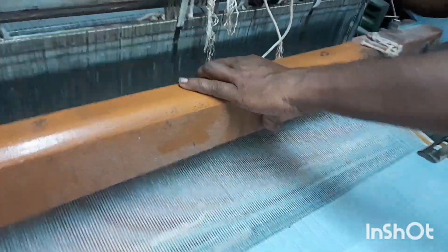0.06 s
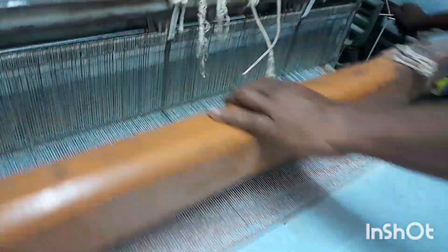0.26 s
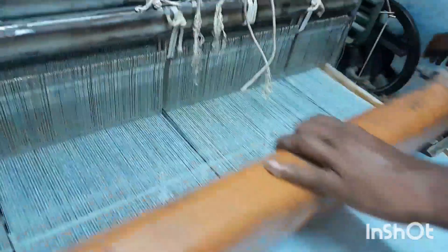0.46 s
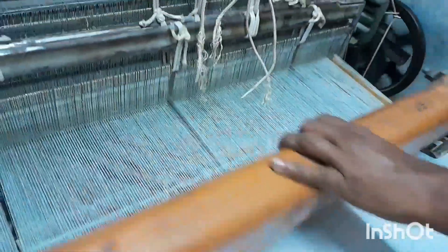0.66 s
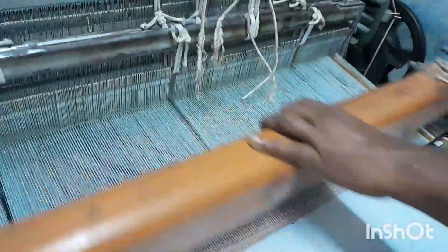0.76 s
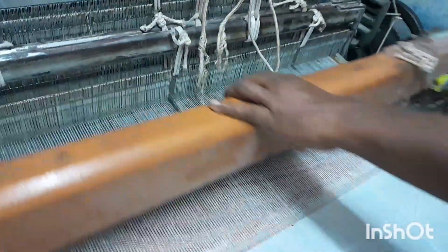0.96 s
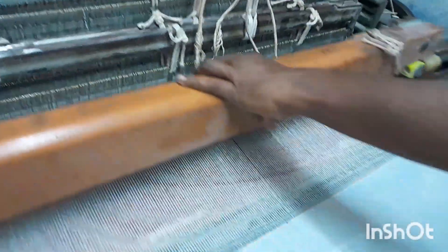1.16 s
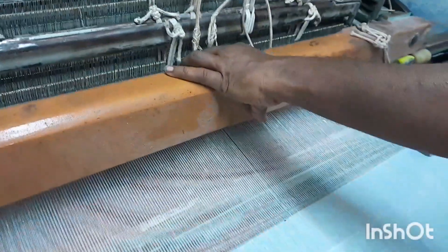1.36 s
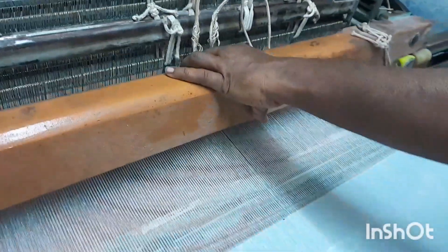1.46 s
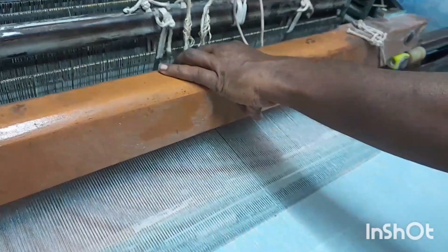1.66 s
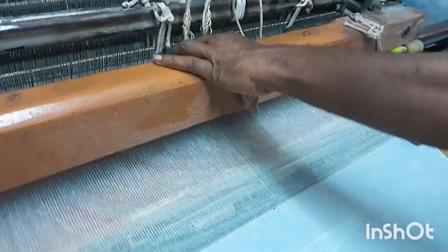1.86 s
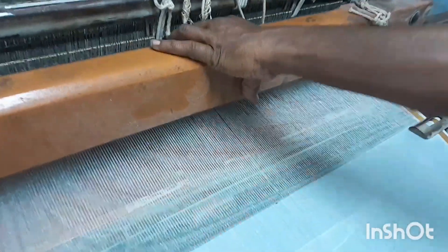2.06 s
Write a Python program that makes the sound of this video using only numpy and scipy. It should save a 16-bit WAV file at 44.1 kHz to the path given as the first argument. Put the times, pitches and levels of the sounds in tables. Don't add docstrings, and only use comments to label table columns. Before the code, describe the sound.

A hand-worked loom clatters through one stroke: links clink, the reed hisses over threads, the beam thumps the cloth, wooden pegs knock on return, and the shuttle slams; close phone microphone in a hard-walled workshop.

```python
import sys
import numpy as np
from scipy import signal
from scipy.fft import rfft, irfft
from scipy.io import wavfile
from scipy.ndimage import uniform_filter1d

SR = 44100
rng = np.random.default_rng(int(sys.argv[2]) if len(sys.argv) > 2 else 0)


def makeup_ratio(level_db):
    decades = np.asarray(level_db, float) / 20
    return 10 ** decades


def store_pcm(level_fs):
    pcm = np.round(np.clip(level_fs, -1, 1) * 32767).astype(np.int16)
    wavfile.write(sys.argv[1], SR, np.atleast_2d(pcm).T)


N = 92610


def evened(x):
    return x / np.sqrt(np.mean(x ** 2) + 1e-20)


def read(points, hz):
    f, value = np.transpose(points)
    return np.interp(np.log(hz + 1), np.log(f + 1), value)


def coloured(x, points):
    hz = abs(np.fft.fftfreq(8192, 1 / SR))
    log_gain = np.log(makeup_ratio(np.maximum(read(points, hz), -100)))
    taps = np.fft.ifft(np.exp(np.conj(signal.hilbert(log_gain)))).real[:4096]
    return signal.oaconvolve(x, taps / np.linalg.norm(taps))[:len(x)]


def level(curve):
    s, db = np.transpose(curve)
    return makeup_ratio(np.interp(np.arange(N) / SR, s, db))


def nearby(x, side):
    port_lag_s, early_s, early_db = .0005, .016, -12
    taps = np.zeros((2, 900))
    at = (rng.random((2, 24)) * early_s * SR).astype(int) + 60
    echoes = rng.choice([-1., 1.], at.shape) * makeup_ratio(early_db - 8 * at / (early_s * SR))
    np.put_along_axis(taps, at, echoes, 1)
    taps[0, 30] = 1
    taps[1, 30 + round(side * port_lag_s * SR)] = 1
    return signal.fftconvolve(x[None], taps / 2, axes=1)[:, 30:len(x) + 30]


def struck(blows, modes, tone, gain_db, rise_s):
    bounces_per_s, bounce_spread_db, first_blow = 1700, 1.5, 12.0
    mode_spread_db, pair_spread = 0.91, .005
    t = np.arange(SR // 2) / SR
    out = np.zeros((2, N + SR))
    peak = round(rise_s * SR)
    for s, db, rattle_s, ring_db, tilt_db in blows:
        hit, size = rng.random(len(t)), rng.exponential(1, len(t))
        hiss = rng.standard_normal(len(t))
        fade = np.exp(-t / max(rattle_s, .002)) * np.minimum((t + 1 / SR) / max(rise_s, 1e-4), 1)
        bounces = (hit < bounces_per_s / SR) * makeup_ratio(bounce_spread_db * np.minimum(size, 4)) * np.sign(hiss)
        bounces[peak] = 1.03
        ring = np.zeros(len(t))
        for hz, mode_db, t60_s in modes:
            a, b = rng.standard_normal(2)
            start_db = mode_db + mode_spread_db * a + tilt_db * np.log2(hz / 2000)
            decay = makeup_ratio(start_db - 60 * t / np.clip(t60_s, .015, .16))
            beating = np.cos(2 * np.pi * hz * pair_spread * b * t)
            ring += decay * np.sin(2 * np.pi * hz * t) * beating
        drive = bounces * fade
        drive[peak] += first_blow
        rung = signal.fftconvolve(drive, ring)[:len(t)]
        tilted = [(hz, tone_db + tilt_db * np.log2(hz / 2000)) for hz, tone_db in tone]
        clatter = coloured((bounces + .5 * hiss) * fade, [(40, -50)] + tilted)
        first = slice(0, 660)
        sound = clatter / np.std(clatter[first]) + makeup_ratio(ring_db) * rung / np.std(rung[first])
        at = round(s * SR)
        out[:, at:at + len(t)] += makeup_ratio(db + gain_db) * nearby(sound, rng.uniform(-0.78, 1))
    return out[:, :N]


# (time [s], strength [dB], rattle [s], ring re clatter [dB], brightness [dB/octave])
LINK_BLOWS = [
    (.1595, -11, 0.0073, -8, 0.1),
    (.2205, -12, 0.023, -16, 0),
    (.259, -17.5, 0.12, -2, -1.5),
    (.2845, -2, 0.055, -2, 1.5),
    (.4105, -1, 0.054, -10, 0.7),
    (.5905, -4, 0.074, -24, 4),
    (.6105, 0.5, 0.05, -9, 1.5),
    (.879, -17.5, 0.0053, -13, -2.5),
    (1.189, -16.5, 0.0067, -21, 4.5),
]
# (frequency [Hz], level [dB], t60 [s])
LINK_MODES = [(3074, -7, .05), (3822, 0, .055), (4980, -7, .07), (5760, -8, .07), (6700, -8, .06),
              (12460, -3, .08), (13130, -8, .07)]
# (frequency [Hz], density [dB/Hz])
LINK_TONE = [(200, -6.5), (800, 6.5), (3500, 2), (6000, 5), (13000, 4)]


def links():
    return struck(LINK_BLOWS, LINK_MODES, LINK_TONE, -9.5, 0.0033)


# (time [s], strength [dB], rattle [s], ring re clatter [dB], brightness [dB/octave])
BOX_BLOWS = [
    (1.4645, -18.5, 0.0043, -30, 1.5),
    (1.4875, -2, 0.023, -22, 0.2),
    (1.5205, -7.5, 0.042, -14, 0.51),
    (1.7035, -13.5, 0.0072, -32, 2.7),
]
# (frequency [Hz], level [dB], t60 [s])
BOX_MODES = [(1723, -10, .07), (2400, 0, .03), (6200, -13, .03), (10000, -9, .1), (12000, -8, .1),
             (12800, -6, .08)]
# (frequency [Hz], density [dB/Hz])
BOX_TONE = [(300, -15), (1700, -0.5), (4500, -8), (6000, -10), (12000, -13.5)]


def shuttle_box():
    return struck(BOX_BLOWS, BOX_MODES, BOX_TONE, -7.5, 0.0017)


# (time [s], strength [dB], rattle [s], ring re clatter [dB], brightness [dB/octave])
PEG_BLOWS = [
    (.1025, -33.5, 0.017, -23, 6),
    (.127, -22, 0.02, -8, 0.3),
    (.195, -17, 0.0094, -1.5, -0.5),
    (.548, -2.5, 0.0044, -32, 5.5),
    (.5874, -15, 0.01, 2, -5),
    (.9695, -13, 0.0067, -3, -0.1),
    (1.0968, 3, 0.014, -36, 2),
    (1.1229, -11, 0.042, -11, -4.5),
    (2.026, -28.5, 0.0081, -30, -4),
]
# (frequency [Hz], level [dB], t60 [s])
PEG_MODES = [(1175, -5, .1), (1800, -2, .03), (2200, 0, .04), (2530, 0, .05), (4963, -5, .05)]
# (frequency [Hz], density [dB/Hz])
PEG_TONE = [(200, -8), (1000, 4.5), (2500, -0.5), (5000, -13), (13000, -19)]


def pegs():
    return struck(PEG_BLOWS, PEG_MODES, PEG_TONE, -12, 0.00103)


# (time [s], strength [dB], rattle [s], ring re clatter [dB], brightness [dB/octave])
PIN_BLOWS = [
    (0.4331, -18.5, 0.036, 9, -0.41),
    (1.0795, -3, 0.01, -11.5, 0.11),
]
# (frequency [Hz], level [dB], t60 [s])
PIN_MODES = [(3250, 2, 0.021), (6200, -5.5, 0.01), (2580, -20, 0.054)]


def pins():
    return struck(PIN_BLOWS, PIN_MODES, BOX_TONE, -12.5, 0.0012)


# (time [s], strength [dB], rattle [s], ring re clatter [dB], brightness [dB/octave])
FRAME_BLOWS = [
    (0.294, -14, 0.098, -8.5, 2.7),
    (0.407, -21.5, 0.012, -14, 0.44),
    (0.655, -11, 0.069, -8, 0.88),
    (0.67, -11.5, 0.031, -0.5, 0.75),
    (0.749, -18.5, 0.051, -38, 0.1),
    (1.315, -28, 0.22, -14, 0.11),
    (1.496, -10, 0.029, -28, 0.34),
    (1.569, -11.5, 0.033, -25, 0.31),
    (1.714, -16.5, 0.029, -24, 0.1),
    (1.758, -26.5, 0.024, 3.5, 0.1),
]
# (frequency [Hz], level [dB], t60 [s])
FRAME_MODES = [(215, -8, .08), (290, -2, .055), (664, -4, .06), (850, -8, .08), (1051, -7, .08)]
# (frequency [Hz], density [dB/Hz])
FRAME_TONE = [(70, -28.5), (200, 4), (700, 1), (1500, 0), (6000, -16), (13000, -19)]


def frame():
    return struck(FRAME_BLOWS, FRAME_MODES, FRAME_TONE, -8.0, .008)


# (time [s], strength [dB], rattle [s], ring re clatter [dB], brightness [dB/octave])
STICK_BLOWS = [
    (1.3565, -13, .012, -22, 2),
]
# (frequency [Hz], level [dB], t60 [s])
STICK_MODES = [(578, -10, .12), (1583, 0, .13), (2000, -12, .07), (2530, -3, .09), (3047, -16, .04)]
# (frequency [Hz], density [dB/Hz])
STICK_TONE = [(200, -12), (600, 6), (1600, -11), (2700, -6), (4500, -17), (13000, -46)]


def stick():
    return struck(STICK_BLOWS, STICK_MODES, STICK_TONE, -10, 0.0034)


# (time [s], frequency [Hz], level [dB], t60 [s])
RINGS = [(0.286, 3767, -15.5, 0.089), (0.288, 3048, -22.5, 0.2), (.304, 5840, -14.5, 0.048),
         (0.409, 3940, -23, 0.046), (.412, 5560, -25, 0.047), (0.421, 2640, -14.5, 0.036),
         (0.439, 3460, -19, 0.035), (0.446, 6060, -19, 0.024), (.549, 2204, -20, .03),
         (.549, 3550, -18, .03), (.588, 6200, -21, 0.042), (0.61, 6200, -13, 0.042),
         (.62, 5850, -11.5, 0.035), (.629, 4900, -18.5, .04), (.616, 973, -17.5, 0.041),
         (.672, 338, -20, 0.1), (.679, 669, -16, 0.087), (1.082, 3250, -22, 0.25),
         (1.0802, 5690, -26, 0.15), (1.0975, 2160, -4.5, 0.021), (1.0963, 1485, -8.5, 0.018),
         (1.1, 2524, -16, 0.056), (1.11, 4920, -15, 0.028), (1.123, 1179, -19.5, 0.16),
         (1.3603, 1583, -12.5, 0.13), (1.36, 2555, -17, 0.08), (1.489, 2440, -5.5, 0.018),
         (1.499, 281.4, -16, 0.085), (1.504, 1737, -22, 0.13), (1.52, 1550, -13, .03),
         (1.705, 6200, -18, 0.011), (1.705, 3270, -30, 0.034), (1.715, 5760, -24, 0.022),
         (1.713, 12760, -18.5, 0.073), (1.707, 9970, -27, 0.13), (1.707, 11940, -26, 0.12),
         (1.489, 10070, -22.5, 0.27), (1.49, 11950, -22, 0.42), (1.465, 4760, -21, 0.0083),
         (1.465, 2700, -21, 0.014), (1.56, 450.2, -29.5, 0.25), (1.57, 212.2, -28, 0.27),
         (1.72, 854, -35.5, 0.43), (1.76, 460, -34.5, 0.4), (1.27, 574.5, -34, 0.56), (.5, 2185, -32, 0.33),
         (.66, 2580, -15.5, 0.037), (1.714, 3160, -17, 0.028), (1.6, 296, -31, 0.3)]


def rings():
    rise_cycles, flutter_db, wander_share = 3.04, 3, .006
    t = np.arange(SR // 2) / SR
    out = np.zeros((2, N + SR))
    for s, hz, db, t60_s in RINGS:
        flutter, wander = evened(uniform_filter1d(rng.standard_normal((2, len(t))), size=130))
        phase = 2 * np.pi * hz * np.cumsum(1 + wander_share * wander) / SR
        phase = phase + np.array([[0], [np.pi / 2 * min(hz / 1200, 1)]])
        fade = makeup_ratio(db + flutter_db * flutter - 60 * t / max(t60_s, .01))
        fade = fade * np.minimum(t * hz / rise_cycles, 1)
        at = round(s * SR)
        out[:, at:at + len(t)] += fade * np.sin(phase)
    return out[:, :N]


# (time [s], level [dB])
STROKE = [(0, -69.5), (.12, -69.5), (.2, -49.5), (.5, -43.5), (.62, -37.5), (.8, -48), (1.0, -44.5),
          (1.3, -50.5), (1.45, -44.5), (1.75, -45), (1.95, -66), (2.1, -62.5)]
# (frequency [Hz], density [dB/Hz])
REED_TONE = [(150, 5.5), (500, 7.5), (1100, 7.5), (2200, 0), (5500, -6), (13000, -12.5)]


def reed():
    slips_per_s, slip_spread_db, clump_db, bleed, gain_db = 5000, 0, 3.1, 0.19, 10
    fizz_hz, fizz_db, fizz_power = 7200, 4, 0.17
    shape = (2, N)
    slips = (rng.random(shape) < slips_per_s / SR) * makeup_ratio(slip_spread_db * rng.exponential(1, shape))
    slips = slips * rng.choice([-1., 1.], shape)
    clumps = makeup_ratio(clump_db * evened(uniform_filter1d(rng.standard_normal(N), size=500)))
    both = slips + bleed * slips[::-1]
    hiss = np.array([coloured(side * clumps, REED_TONE) for side in both])
    push = level(STROKE)
    highpass = signal.butter(4, fizz_hz, "high", fs=SR, output="sos")
    fizz = signal.sosfilt(highpass, hiss)
    hiss = hiss + fizz * (makeup_ratio(fizz_db) * (push / push.max()) ** fizz_power - 1)
    return makeup_ratio(gain_db) * push * evened(hiss)


# (time [s], level [dB])
HUMS = [
    (0.693, -17),
    (0.882, -25),
    (1.357, -28),
    (1.509, -28.5),
    (1.703, -25.5),
]


def floor_hum():
    hum_hz, rise_s, t60_s = 109, 0.026, 0.3
    out = np.zeros(N)
    for s, db in HUMS:
        since_s = np.maximum(np.arange(N) / SR - s, 0)
        swell = (1 - np.exp(-since_s / rise_s)) ** 2
        out += makeup_ratio(db - 60 * since_s / t60_s) * swell * np.sin(2 * np.pi * hum_hz * since_s)
    return out


def squeak():
    start_s, length_s, hz, db = 1.976, 0.042, 1340, -52
    t = np.arange(N) / SR
    u = np.clip((t - start_s) / length_s, 0, 1)
    return makeup_ratio(db) * np.sin(np.pi * u) ** .5 * np.sin(2 * np.pi * hz * t)


# (frequency [Hz], density [dB/Hz])
AIR_TONE = [(15, -45), (25, 3), (826, -24.5), (934, -10), (3620, -49), (7210, -25.5), (9000, -74),
            (11700, -88), (19800, -120)]
# (time [s], level [dB])
RUMBLE = [(0, -49), (.4, -61.5), (.6, -51), (1.3, -44.5), (1.6, -52), (2.1, -55)]


def air():
    band = signal.butter(2, [38, 66], "band", fs=SR, output="sos")
    shake = signal.sosfilt(band, rng.standard_normal(N))
    hum = np.array([evened(coloured(rng.standard_normal(N), AIR_TONE)) for _ in range(2)])
    return makeup_ratio(-50.5) * hum + level(RUMBLE) * evened(shake)


# (frequency [Hz], t60 [s])
ROOM = [(100, 1), (400, 0.97), (1500, 0.3), (5000, 0.43), (12000, 0.19)]


def room():
    delay_s, spacing = .006, 20
    taps = np.zeros((2, SR))
    slots = np.arange(round(delay_s * SR), SR - spacing, spacing)
    at = slots + rng.integers(0, spacing, (2, SR))[:, :len(slots)]
    signs = rng.choice([-1., 1.], (2, SR))[:, :len(slots)]
    np.put_along_axis(taps, at, signs, 1)
    hz, t, z = signal.stft(taps, SR, nperseg=256)
    z = z * makeup_ratio(-60 * t / np.maximum(read(ROOM, hz), .05)[:, None])
    z = z / np.linalg.norm(z, axis=2, keepdims=True)
    tail = signal.istft(z, SR, nperseg=256)[1]
    return tail / np.linalg.norm(tail[0])


def scene():
    loom = links() + pins() + shuttle_box() + pegs() + stick() + frame() + reed() + squeak()
    tail = room()
    steady = floor_hum() + air()
    loom = loom + rings()
    reverb = signal.fftconvolve(loom, tail, axes=1)[:, :N]
    return loom + makeup_ratio(-4.5) * reverb + steady


def patchy(x):
    patch_hz, patch_db, hole_share = 7860, -2.5, 0.068
    bins, frames = 6, 10
    hz, t, z = signal.stft(x, SR, nperseg=512, noverlap=384)
    shape = (len(hz) // bins + 1, len(t) // frames + 1)
    blocks = makeup_ratio(patch_db * rng.standard_normal(shape)) * (rng.random(shape) > hole_share)
    gain = np.kron(blocks, np.ones((bins, frames)))[:len(hz), :len(t)]
    z = z * np.where(hz[:, None] > patch_hz, gain, 1)
    return signal.istft(z, SR, nperseg=512, noverlap=384)[1][:, :N]


def roll_off(x):
    return signal.sosfilt(signal.butter(12, 16190, fs=SR, output="sos"), x)


# (frequency [Hz], likeness [0-1])
SAME = [(60, .97), (250, .9), (600, .5), (1200, 0)]
# (frequency [Hz], difference [dB])
LEAN = [(60, -3.5), (130, 0.5), (290, 0), (640, -1), (1410, 1.5), (3100, 5.5), (6820, 8), (8600, -13.5),
        (15000, -9.5)]
# (frequency [Hz], gain [dB])
MIC = [(20, -23), (45, -1.5), (6000, -0.5), (7200, -8), (8600, -22.5), (10500, -17.5), (13000, -13),
       (15500, -26.5)]


def record(dry):
    hz = np.fft.rfftfreq(2 * N, 1 / SR)
    z = rfft(dry, 2 * N)
    same = np.clip(read(SAME, hz), 0, 1) ** 2
    z = same * z.mean(0) + np.sqrt(1 - same ** 2) * z
    lean = makeup_ratio(read(LEAN, hz))
    sides = np.array([lean, np.ones_like(lean)]) * np.sqrt(2 / (1 + lean ** 2))
    z = z * sides * makeup_ratio(read(MIC, hz)) * (hz < 16050)
    mix = patchy(irfft(z)[:, :N])
    return roll_off(mix)


dry = scene()
out = record(dry)
store_pcm(out)
```